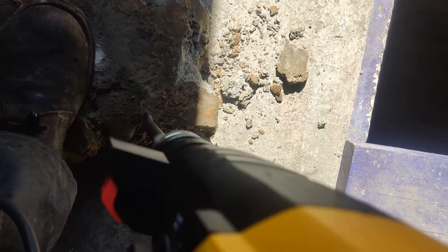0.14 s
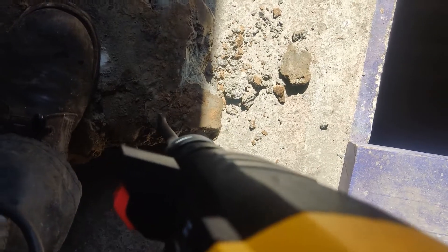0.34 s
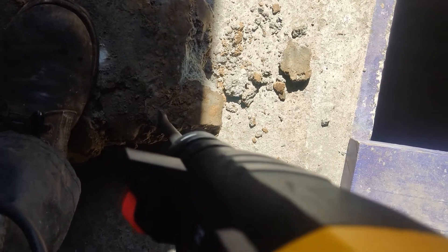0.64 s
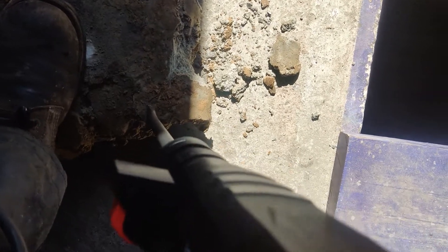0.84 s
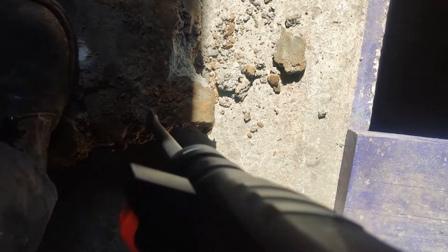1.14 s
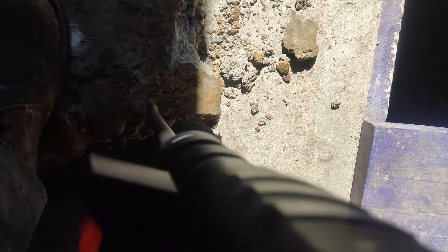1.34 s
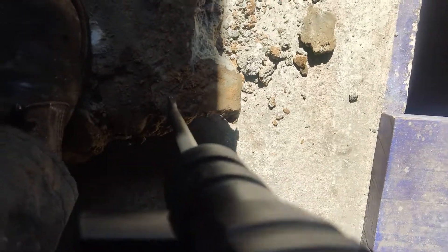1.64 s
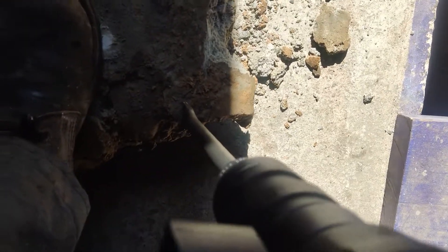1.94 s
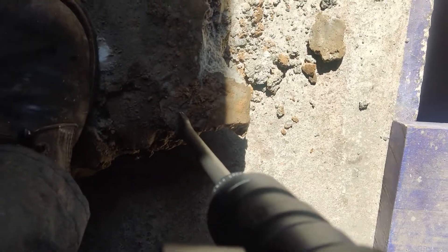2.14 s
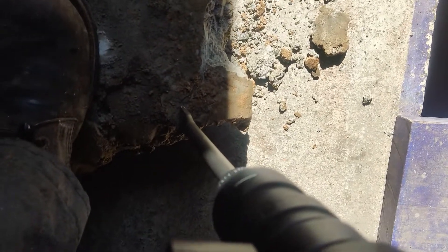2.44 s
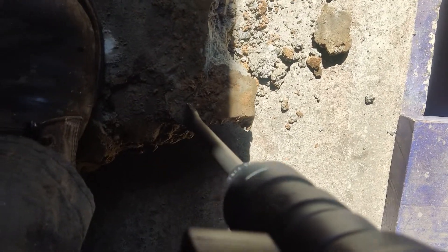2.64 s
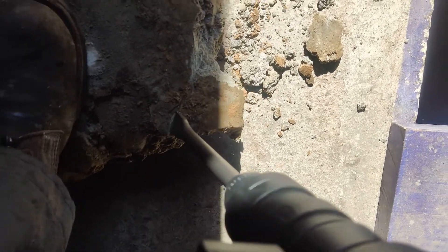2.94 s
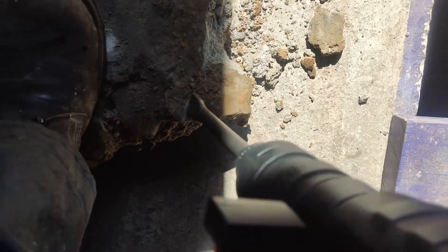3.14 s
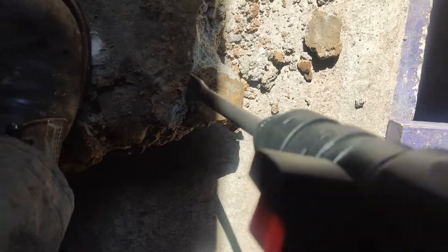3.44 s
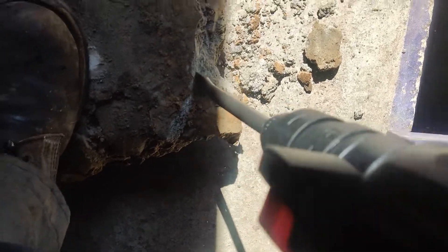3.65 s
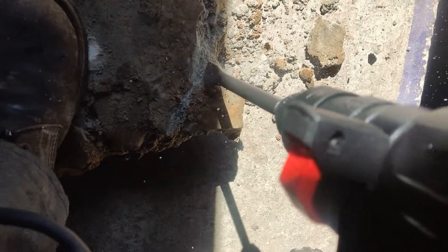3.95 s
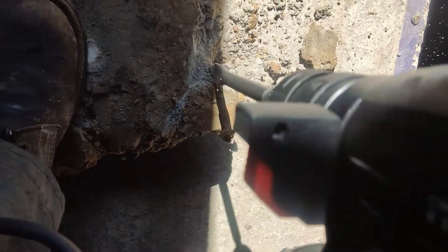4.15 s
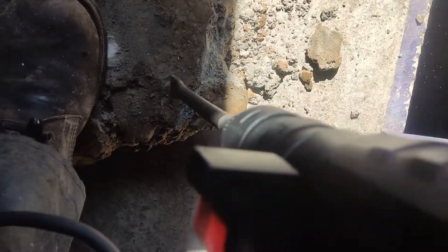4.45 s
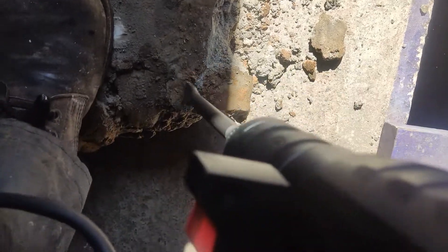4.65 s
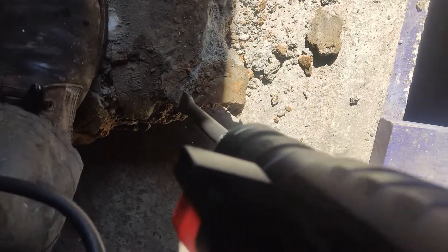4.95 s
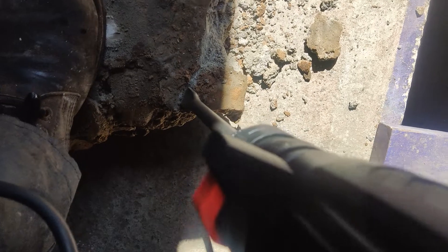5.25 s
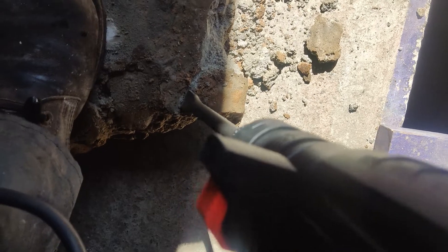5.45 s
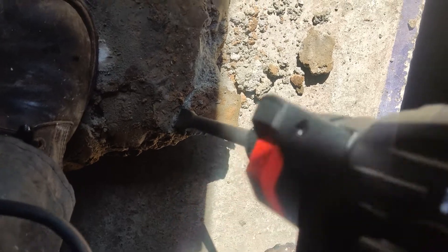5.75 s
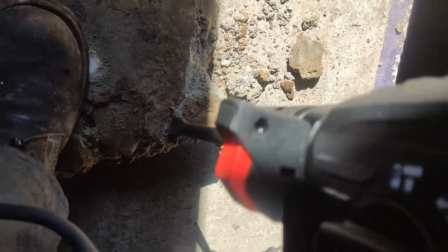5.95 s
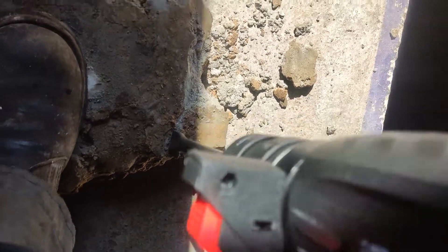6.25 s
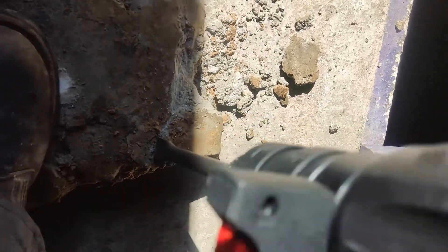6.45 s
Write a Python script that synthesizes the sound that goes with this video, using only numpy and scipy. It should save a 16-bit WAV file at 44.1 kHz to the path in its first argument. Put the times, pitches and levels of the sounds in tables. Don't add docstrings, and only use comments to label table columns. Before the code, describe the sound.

From 0 to 2 s, low hand and wind rumble lies under soft, bright rustling of cloth and grit. A double knock of the bit on concrete falls at about 0.18 s, faint rubble ticks follow, and a soft hollow bump comes at 1.5 s. At 2.1 s a rotary hammer stirs with loose rattles and ticks, then speeds up; from 2.5 to 3 s, bright cement cracks scatter over the blows. By 3 s it pounds at nearly sixty blows a second, gears chattering and steel ringing more from 3.4 s, fastest and loudest around 3.9 s. Released near 4.2 s, it coasts down, duller, with loose knocks, groans and dragging puffs, resting by 5.1 s. After a tiny silence, the bit scrapes and lands sharply at 5.2 s, rubble clicks to 5.7 s, rumble returns, and crisp rustling swells from 6.2 s to the end, with a faint bump at 6.3 s. Close, dry stereo.

```python
import sys
import numpy as np
from scipy import signal
from scipy.fft import rfft, irfft, next_fast_len
from scipy.io import wavfile
from scipy.ndimage import uniform_filter1d

SR = 44100
rng = np.random.default_rng(int(sys.argv[2]) if len(sys.argv) > 2 else 0)


def transcribe(signal):
    frames = np.atleast_2d(signal).T
    limited = np.clip(frames, -1, 1)
    pcm = np.round(limited * 32767).astype(np.int16)
    wavfile.write(sys.argv[1], SR, pcm)


def amplitude_ratio(level_db):
    exponent = np.asarray(level_db, float) / 20
    return 10 ** exponent


N = 290619
T = np.arange(N) / SR
SIDES = np.array([[.5], [-.5]])
RELEASE_S = 4.175
PORT_LAG, SLAB_LAG = 20, 14


def curve(table):
    return np.interp(T, *np.transpose(table))


def columns(table):
    s, *values = np.transpose(table)
    inside = uniform_filter1d(1. * ((T >= s[0]) & (T <= s[-1])), size=40)
    return inside, [np.interp(T, s, v) for v in values]


def unit(x):
    return x / np.sqrt(np.mean(x ** 2))


def steady(x):
    return x / np.sqrt(uniform_filter1d(x ** 2, size=5000) + 1e-12)


def walk(rate):
    hold = int(SR / rate)
    goals = np.repeat(rng.standard_normal(N // hold + 1), hold)
    return 0.47 * uniform_filter1d(goals, hold)[:N]


def noise(alike, count=0):
    alike = np.clip(alike, 0, 1)
    shared, *own = rng.standard_normal((3, N))
    together = np.array([np.roll(shared, count), shared])
    return np.sqrt(alike) * together + np.sqrt(1 - alike) * np.array(own)


def ring(x, modes, patchy_db=0):
    total = 0
    for k, (hz, width_hz, db) in enumerate(modes):
        gain = amplitude_ratio(db + patchy_db * walk(14)) if patchy_db else amplitude_ratio(db)
        tone = signal.lfilter(*signal.iirpeak(hz, hz / width_hz, SR), x)
        total = total + (-1) ** k * gain * tone
    return total


def band(x, lo_hz, hi_hz):
    return signal.sosfilt(signal.butter(3, [lo_hz, hi_hz], "band", fs=SR, output="sos"), x)


def colour(x, points):
    hz, db = np.transpose(points)
    n = next_fast_len(N)
    log_hz = np.log(np.arange(n // 2 + 1) * SR / n + 1)
    shape = amplitude_ratio(np.interp(log_hz, np.log(hz), db))
    return unit(irfft(rfft(x, n) * shape, n)[:, :N])


def bursts(s, size, decay_ms):
    x = np.zeros(np.shape(size)[:-1] + (N,))
    np.add.at(x, (..., (s * SR).astype(int)), size)
    return signal.lfilter([1], [1, -np.exp(-1000 / (decay_ms * SR))], x)


def swell(s, half, db):
    return amplitude_ratio(db) * np.sqrt(np.clip(1 - ((T - s) / half) ** 2, 0, 1))


def stirs(rows, bed_db):
    # start_s, end_s
    hush_s = (1.912, 5.13)
    hush = (T > hush_s[0]) & (T < hush_s[1])
    power = amplitude_ratio(bed_db - 11.5 * hush) ** 2
    for s, half, db in rows:
        same_side = hush == (hush_s[0] < s < hush_s[1])
        power = power + (amplitude_ratio(db) * np.clip(1 - ((T - s) / half) ** 2, 0, 1) * same_side) ** 2
    return np.sqrt(power)


def rumble():
    # time_s, level_db
    hum_level = [(0, -59), (.21, -46), (1.33, -44), (1.41, -55.5), (1.5, -43.5), (1.9, -57), (1.93, -62),
                 (2.5, -73), (2.67, -57.5), (3.04, -51.5), (3.67, -57), (3.8, -38), (4.12, -50.5),
                 (4.25, -76), (4.87, -53), (5.12, -54), (5.3, -37.5), (6.59, -43)]
    # pitch_hz, width_hz, level_db
    sway_modes = [(22.8, 8.8, 0)]
    hum_modes = [(58.1, 9.6, 6.5), (69.7, 22, -6)]
    drone_modes = [(114.4, 21.6, -1), (137, 31.5, -7.5), (151.5, 14.3, -2), (202.5, 47.4, -3),
                   (225.6, 91, -7.5)]
    # time_s, level_db
    tone_level = [(0, -67), (1.9, -77), (1.92, -99), (4.43, -97), (4.49, -66), (4.56, -89), (4.69, -68),
                  (4.9, -72), (5.0, -99), (5.35, -97), (5.45, -63), (5.9, -49.5), (6.3, -52), (6.36, -89),
                  (6.59, -85)]
    # centre_s, half_length_s, drone_db, sway_over_drone_db
    jolts = [(0.266, 0.11, -42.5, -22), (.98, .15, -80, -9), (1.526, 0.032, -54.5, -8),
             (1.773, 0.37, -66.5, 14), (2.3, 0.25, -53.5, -32), (2.673, 0.22, -63, 7),
             (3.015, 0.14, -53.5, 5), (3.434, 0.044, -43.5, 12), (3.475, 0.44, -47.5, 5),
             (3.894, 0.34, -45, 8), (4.62, 0.47, -86, 29), (4.96, 0.22, -63.5, 9), (5.274, 0.049, -34, -20),
             (5.307, 0.19, -43, -6), (5.775, 0.58, -53.5, 11.5), (6.07, 0.1, -57, -4),
             (6.436, 0.19, -52.5, 12.5)]
    sway_level = stirs([(s, half, db + share) for s, half, db, share in jolts], -68)
    sway = unit(band(ring(noise(0.53), sway_modes), 18.2, 28.1)) * sway_level
    hum = unit(band(ring(noise(.92), hum_modes), 25.0, 113)) * amplitude_ratio(curve(hum_level))
    drone_level = stirs([row[:3] for row in jolts], -64)
    drone = unit(band(ring(noise(0.88), drone_modes), 88.0, 298)) * drone_level
    tone_hz = 200.6 + 3 * walk(36)
    tone = np.sin(2 * np.pi * np.cumsum(tone_hz) / SR) * amplitude_ratio(curve(tone_level) + 2 * walk(1.82))
    return sway + hum + drone + tone


def membrane_drift():
    # time_s, offset (share of full scale)
    offset = [(4.12, 0), (4.19, .014), (4.31, 0), (4.45, -.008), (4.7, -.01), (4.9, 0)]
    return uniform_filter1d(curve(offset), size=2500)


def rustle():
    # centre_s, half_length_s, hiss_db, dull_over_hiss_db, left_minus_right_db
    rubs = [(0.02, 0.16, -57.5, -5, -2), (0.24, 0.11, -56.5, 3, 0), (0.655, 0.088, -59, -11, -6),
            (0.715, 0.034, -61, -9, -3), (0.824, 0.2, -57.5, -2, -0.5), (1.098, 0.15, -56.5, -5.5, -1.5),
            (1.357, 0.13, -57, -7.5, 6), (1.58, 0.15, -55, -5, 4), (1.838, 0.16, -62, -4, 3.5),
            (5.143, 0.017, -49, 3, 14), (5.16, 0.04, -52, 6.5, 4), (5.217, 0.044, -45, 4, 2),
            (5.288, 0.099, -54.5, 3, -2), (5.55, 0.3, -56.5, -2.5, -3.5), (5.89, 0.22, -56, -5.5, 2.5),
            (6.127, 0.071, -59.5, -8, 9), (6.246, 0.1, -38, -41, 13.5), (6.202, 0.029, -47, -30, 11),
            (6.32, 0.098, -42, -18, 11), (6.396, 0.027, -44, -14, 10), (6.436, 0.05, -52, -13, 8),
            (6.528, 0.11, -46.5, -13, 8)]
    # pitch_hz, level_db (per Hz)
    dull_spectrum = [(150, -45), (250, 0), (418, -5.5), (551, -3), (601, -3.5), (822, -7.5), (5000, -18.5),
                     (6500, -17.5), (11000, -120)]
    # pitch_hz, level_db (per Hz)
    left_spectrum = [(3000, -25.5), (4000, -20.5), (6500, -19), (8400, -13), (9500, -11), (10700, -5.5),
                     (12500, -14), (14500, -16.5)]
    right_spectrum = [(3000, -21.5), (4000, -13.5), (6500, -16.5), (8400, -2.5), (9500, -13), (10700, -17),
                      (12500, -24), (14500, -20)]
    left, right = noise(0)[:, None] * amplitude_ratio(2.0 * walk(700))
    hiss = np.vstack([colour(left, left_spectrum), colour(right, right_spectrum)])
    bright_level = stirs([(s, half, db + SIDES * pan) for s, half, db, _, pan in rubs], -66)
    hiss = hiss * bright_level * amplitude_ratio(3.8 * walk(25))
    dull = colour(noise(0.22) * amplitude_ratio(2.0 * walk(200)), dull_spectrum)
    dull_level = stirs([(s, half, db + share) for s, half, db, share, _ in rubs], -66)
    return hiss + dull * dull_level * amplitude_ratio(walk(13))


def strokes():
    # centre_s, half_length_s, level_db
    swishes = [(0.645, 0.046, -71), (1.091, 0.062, -53), (1.249, 0.021, -52), (1.35, 0.04, -56),
               (1.598, 0.054, -48.5), (5.559, 0.015, -49)]
    # pitch_hz, width_hz, level_db
    sleeve_modes = [(4170, 2100, -1), (8700, 1240, 7.5), (10600, 2000, 4), (13100, 2000, -2)]
    # centre_s, half_length_s, level_db
    bit_scrape = (5.2, .021, -42)
    # pitch_hz, width_hz, level_db
    scrape_modes = [(1000, 200, -4), (2000, 200, 0), (2800, 200, -6), (3550, 200, -1)]
    sleeve = unit(ring(noise(0), sleeve_modes)) * sum(swell(*row) for row in swishes)
    grains = noise(0.065) * amplitude_ratio(2.1 * walk(500))
    return sleeve + unit(ring(grains, scrape_modes)) * swell(*bit_scrape)


def knocks():
    # time_s, peak_db, hardness_db, left_minus_right_db
    landings = [(0.1799, -26, -16, -0.5), (0.185, -18.5, 2, -3), (5.1425, -32.5, 4.5, -8),
                (5.2192, -24.5, -7, 0), (5.2364, -17, 5.5, -2), (1.5092, -50, -1, 0),
                (5.6072, -39.5, 7, -4.5), (5.6213, -42.5, -20, 0)]
    # time_s, peak_db, hardness_db,
    # left_minus_right_db
    rubble = [(0.1444, -35.5, 7.5, -1), (0.4208, -49.5, 3, 2), (0.451, -59, -1.5, 5),
              (0.478, -49.5, 3.5, -6), (0.6875, -47, -2, -3), (0.607, -65, -3.5, 0), (2.3203, -41, -2, 4),
              (5.4224, -31.5, 4, -6.5), (5.478, -41.5, 2.5, 2), (5.4906, -38.5, 5.5, -6)]
    # time_s, peak_db, hardness_db, left_minus_right_db
    ticks = [(0.925, -52.5, 7, 2), (1.835, -50, -3, -.5), (2.083, -28.5, 3.5, -2), (0.476, -54, -14, -2),
             (0.6883, -42.5, -14, -3), (1.51, -51, -5, 1), (5.1356, -46, 8, -9), (5.1434, -38, -3, -8),
             (5.1832, -49, -10, -2), (5.22, -38, 10, -11), (6.178, -44, 6, 6), (2.242, -28, 11.5, -1),
             (2.477, -23.5, -8, 0), (5.498, -45.5, 13, 12), (5.576, -51, 18, -11), (5.6891, -46.5, 11, -6),
             (6.31, -37, 3, -8), (6.3992, -35, 0.5, 17.5), (6.436, -51, 8, 3), (6.4474, -56, 10, 7)]
    # boom_db, body_db, crack_db, then body and crack change in dB per dB of hardness
    kinds = [
        (-13.5, -13, -13.5, -0.21, 1),
        (-29, -4.5, -15.5, -1.72, .3),
        (-62, -25, -7.5, 0.7, 0.66),
    ]
    # pitch_hz, width_hz, level_db
    body_modes = [(330, 160, -2), (490, 100, 3), (760, 200, -1), (1050, 300, -4), (1300, 350, -9)]
    boom_modes = [(91.2, 7.9, 0.5), (136, 18, -5), (145, 8.6, 2), (184.6, 9.8, -2.5), (224.5, 4.9, -7),
                  (290.5, 8.8, -3), (344, 12.4, -8.5), (504, 28, -14.5)]
    tables = landings, rubble, ticks
    s, peak, hard, pan = np.vstack(tables).T
    per_knock = np.repeat(kinds, [len(t) for t in tables], axis=0)
    boom, body, crack, body_slope, crack_slope = per_knock.T
    body, crack = body + body_slope * hard, crack + crack_slope * hard
    peak = peak + SIDES * pan

    push = 3 * bursts(s, amplitude_ratio(peak - 9.5), 0.18)
    splinters = bursts(s, amplitude_ratio(peak + 9.5), 0.84) * noise(0.039)
    click = band(push + splinters, 1500, 3160)
    push = 3 * bursts(s, amplitude_ratio(peak + crack - 7), 0.008)
    splinters = bursts(s, amplitude_ratio(peak + crack + 14.0), 1.0) * noise(0.017)
    click += band(push + splinters, 5160, 10600)
    push = bursts(s, amplitude_ratio(peak + body + 23.0), 0.12)
    splinters = bursts(s, amplitude_ratio(peak + body + 24.0), 5.0) * noise(0.4)
    click += ring(push + splinters, body_modes)
    click += band(bursts(s, amplitude_ratio(peak + body + 6.5), 1.0), 105, 280)

    yard = band(bursts(s, amplitude_ratio(peak - 15.5), 16.5) * noise(0), 130, 10300)
    heavy = amplitude_ratio(peak + boom - 0.65 * hard + 29.5)
    slab_push = bursts(s, heavy, 0.69) + .5 * bursts(s, heavy, 21.5) * noise(0.93)
    return click + yard + ring(slab_push, boom_modes)


def bumps():
    # time_s, level_db, contact_ms
    contacts_felt = [
        (1.5103, -26.5, 0.4),
        (1.5183, -38, .9),
        (6.305, -42, 0.54),
        (6.3135, -46, .6),
    ]
    # pitch_hz, width_hz, level_db
    hollow = [(490, 38, -4)]
    push = sum(amplitude_ratio(db) * np.exp(-np.abs(T - s) * 1000 / ms) for s, db, ms in contacts_felt)
    return push - uniform_filter1d(push, size=330) + 2.5 * ring(push, hollow)


def chips():
    # time_s, peak_db
    cracks = [(2.4874, -15), (2.507, -18), (2.5167, -20), (2.5439, -17), (2.5621, -20), (2.571, -15),
              (2.597, -20), (2.6234, -20), (2.6472, -17), (2.6727, -14), (2.6971, -21), (2.724, -11.5),
              (2.747, -12), (2.7703, -15.5), (2.776, -16), (2.8143, -19), (2.841, -16), (2.864, -17),
              (2.8865, -24), (2.9076, -15), (2.929, -25), (2.947, -15), (2.535, -20), (2.577, -20),
              (2.590, -21), (2.615, -18), (2.667, -21), (2.678, -15), (2.737, -22), (2.787, -21),
              (2.798, -20), (2.820, -18), (2.845, -18), (2.966, -16), (2.985, -18)]
    # pitch_hz, width_hz, level_db
    chip_modes = [(3940, 930, -3.5), (8500, 1200, -1), (10840, 690, 2), (13600, 3000, -6.5)]
    # time_s, level_db, left_minus_right_db, pitch_hz, width_hz
    chuck_snap = (5.2363, 1, -10, 7900, 2600)
    s, db = np.transpose(cracks)
    chipping = unit(ring(noise(0.33), chip_modes)) * bursts(s, amplitude_ratio(db - 7.0), 1)
    at, snap_db, pan, hz, width_hz = chuck_snap
    snap_level = uniform_filter1d(bursts(np.array([at]), amplitude_ratio(snap_db + SIDES * pan), .2), size=20)
    snap = snap_level * np.sin(2 * np.pi * hz * (T - at))
    return chipping + ring(snap, [(hz, width_hz, 0)])


def coast(gear_db, housing_db, top_pan, body_pan):
    # time_s, chuck_db (over its rattle), housing_db (over its rattle)
    loose = [(4.181, -5, 10), (4.2045, 4, 4), (4.2144, 5, 8), (4.253, 9, 6), (4.2662, 11, 7),
             (4.2782, 0, 8.5), (4.2937, 13.5, 1), (4.3084, 6, -2), (4.324, 10, -6), (4.3387, 8, 1),
             (4.358, 8, 10), (4.373, 9, 6), (4.393, 10, 8), (4.427, 5, 5), (4.446, 7, 6), (4.4653, 9.5, 9),
             (4.5177, 4, -14), (4.5356, -2, -13), (4.544, -9, -4), (4.569, 10, -13), (4.601, 3, -1),
             (4.623, 7, -5), (4.6945, 12, 1), (4.773, 4, -18), (4.791, 6, -11)]
    # pitch_hz, width_hz, level_db
    chuck_modes = [(4140, 1800, -9), (6180, 950, -2.5), (8470, 1170, -1), (10860, 710, 0),
                   (12250, 1100, -9.5), (14050, 450, -19)]
    shell_modes = [(334, 170, -17.5), (620, 340, -13), (1100, 330, -4.5), (1730, 460, -1.5), (2175, 650, 0),
                   (2740, 450, -1.5), (3410, 600, -6)]
    # start_s, length_s, level_db (over the hiss)
    drags = [(4.832, 0.013, 2.5), (4.866, 0.0075, 4), (4.888, 0.018, 6), (4.927, 0.014, 8.5),
             (4.966, 0.018, 10.5), (5.017, 0.029, 10)]
    # centre_s, half_length_s, level_db (over the housing)
    groans = [(4.21, .04, -14), (4.36, .04, -15), (4.615, 0.026, -8.5), (4.8, .015, -14),
              (4.87, 0.016, -12), (4.925, 0.028, -10.5)]
    # pitch_hz, width_hz, level_db
    groan_modes = [(520, 150, 0.16)]
    s, chuck_db, shell_db = np.transpose(loose)
    drag_db = sum(db * ((T > start) & (T < start + length)) for start, length, db in drags)
    puffs = amplitude_ratio(uniform_filter1d(drag_db, size=80))
    chuck = amplitude_ratio(2.9 * walk(700)) + uniform_filter1d(bursts(s, amplitude_ratio(chuck_db), 2), size=90)
    shell = amplitude_ratio(2.9 * walk(700)) + uniform_filter1d(bursts(s, amplitude_ratio(shell_db), 2), size=90)
    top = ring(noise(0.17, count=PORT_LAG), chuck_modes, patchy_db=3.0)
    top = unit(band(top, 2300, 13000)) * chuck * puffs
    body = ring(noise(0.44, count=PORT_LAG) * shell, shell_modes, patchy_db=3.5)
    body = unit(band(body, 200, 4300))
    body = body + unit(ring(noise(0.7, count=SLAB_LAG), groan_modes)) * sum(swell(*row) for row in groans)
    top = top * amplitude_ratio(gear_db - 2.0 + SIDES * 1.08 * top_pan)
    return top + body * amplitude_ratio(housing_db - 1.5 + SIDES * 0.66 * body_pan)


def crank():
    # time_s, speed (turns per second)
    powered = [(2.08, 8.0), (2.3, 17.0), (2.4, 25.37), (2.5, 35.12), (2.6, 38.57), (2.8, 42.52),
               (2.9, 46.41), (3.0, 54.79), (3.1, 56.17), (3.3, 58.05), (3.5, 57.66), (3.68, 58.1),
               (3.78, 68.16), (3.9, 73.13), (4.0, 69.91), (4.1, 56.97)]
    coast_s = .38
    s, rate = np.transpose(powered)
    speed = np.interp(T, s, rate) * np.exp(-np.maximum(T - s[-1], 0) / coast_s)
    turn = .53 + np.cumsum(speed * (T >= s[0])) / SR
    return turn, speed


def turn_contacts(turn):
    contacts = [
        (0, .002, .9),
        (.15, .015, 3),
        (.56, .025, 3.5),
    ]
    count = np.arange(1, int(turn[-1]) - 1)
    chance = rng.standard_normal((len(count), 3, 2))
    times, sizes = [], []
    for k, (place, slip, scatter_db) in enumerate(contacts):
        times.append(np.interp(count + place + slip * chance[:, k, 0], turn, T))
        sizes.append(amplitude_ratio(scatter_db * chance[:, k, 1]))
    return times, sizes


def rattle(times, sizes, speed, load, part_db, top_pan, body_pan):
    # decay_ms, blow_db, rebound_db, reversal_db (over the rattle), left_minus_right_db, likeness (0-1)
    answer = [
        (1.2, 14, 9, 5, 1.5, .2),
        (1.1, 13, 10, 8.5, -1.5, .15),
        (1.3, 3, 8, 7, -2, .5),
        (1.5, 3, 2, 0, .3, .55),
    ]
    # pitch_hz, width_hz, level_db
    bit = [(10620, 290, 13), (12300, 670, 1.5), (13600, 1300, -7)]
    gears = [(8300, 670, -14.5), (7280, 1300, -5), (4700, 2250, -3), (5490, 1850, 1.5), (8520, 2200, 3.5)]
    housing = [(1690, 1900, -5.5), (2074, 260, 3.5), (2540, 760, -4.5), (3610, 545, 2), (4075, 1050, -6)]
    slab = [(350, 74, -8), (550, 150, -5.5), (744, 116, -4), (936, 180, -3.5)]
    patchy = [1, 2.2, 2.3, 1.4]
    grit = amplitude_ratio(2.5 * walk(900)) * np.clip(speed / 45, 1, 2) ** 1.6
    pans = top_pan, top_pan, body_pan, body_pan
    handed_over = .8, 0, 0, .8
    total = 0
    parts = zip(answer, (bit, gears, housing, slab), part_db, pans, patchy, handed_over)
    for (ms, *contact_db, side_db, alike), modes, db, pan, patchy_db, given in parts:
        blow, rebound, reversal = (amplitude_ratio(d) * bursts(t, z, ms) for d, t, z in zip(contact_db, times, sizes))
        hits = load * (blow + rebound) + np.clip(0.95 * load, .3, 1) * reversal
        shake = steady(grit + uniform_filter1d(hits, size=70))
        sound = unit(ring(shake * noise(alike, count=PORT_LAG), modes, patchy_db=patchy_db))
        level = amplitude_ratio(db + SIDES * (0.52 * pan + side_db))
        total = total + np.sqrt(1 - given * load ** 2) * sound * level
    return total


def struck_steel(times, sizes, bit_db, gear_db, top_pan):
    # pitch_hz, width_hz, level_db
    light_modes = [(10860, 300, 0), (12950, 330, -6)]
    seated_modes = [(10670, 130, 0), (11000, 500, -7), (12700, 90, -5)]
    tip_modes = [(13970, 110, 0), (14150, 90, -2)]
    clang_modes = [(8200, 360, 0)]
    # time_s, level_db
    freedom = [(2.3, -3), (2.9, -0.5), (3.15, -1), (3.35, 1), (3.55, 5.5), (3.68, 3.5), (3.78, 3.5),
               (3.9, -2.5), (4.1, 2), (4.2, 11)]
    # time_s, level_db (under the bit)
    singing = [(2.4, -26), (2.9, -18), (3.05, -17), (3.12, -26), (3.5, -30), (3.72, -28), (3.8, -19),
               (4.05, -15), (4.2, -18)]
    # centre_s, half_length_s, level_db
    clang = (3.485, 0.074, -5.5)
    hits = bursts(times[0], sizes[0], 1.6) + 0.3 * bursts(times[1], sizes[1], 2.5) + .05
    strike = steady(uniform_filter1d(hits, size=90)) * (T > 2.2) * (T < 4.9)
    struck = strike * noise(0.02)
    seated = uniform_filter1d(1. * (T > 3.41), size=4000)
    light_ring = ring(struck * (1 - seated), light_modes, patchy_db=4.0)
    seated_ring = ring(struck * seated, seated_modes, patchy_db=-0.5)
    steel = unit(light_ring + 1.02 * seated_ring)
    steel = steel + 3 * unit(ring(struck, tip_modes)) * amplitude_ratio(curve(singing))
    steel = steel * amplitude_ratio(bit_db - 6.0 + curve(freedom) + SIDES * (top_pan + 17.0))
    return steel + unit(ring(struck, clang_modes)) * swell(*clang) * amplitude_ratio(gear_db + SIDES * top_pan)


def pushed_slab_and_barrel(times, sizes, slab_db, housing_db):
    # pitch_hz, width_hz, level_db
    thud_modes = [(500, 136, 0), (754, 180, -1.5)]
    low_modes = [(70, 57, -8), (186, 49, -2), (332, 62, 0.5)]
    barrel_modes = [(1569, 30, 0)]
    # time_s, whole_slab_db, barrel_db
    coupling = [(2.4, -12, -4), (2.85, -9, -3.5), (3.0, -6.5, -3.5), (3.15, -2, 2.5), (3.45, 1, 0.5),
                (3.6, 4.5, -9), (3.75, -3.5, -5), (3.9, -5, 6), (4.0, -5, 3), (4.15, -9, -4)]
    push = steady(bursts(times[0], sizes[0] ** .8, 0.027)) * (T > 2.2) * (T < 4.9)
    _, (whole_db, barrel_db) = columns(coupling)
    to_slab = np.array([np.roll(push, SLAB_LAG), push])
    low = unit(ring(to_slab, low_modes, patchy_db=6.5)) * amplitude_ratio(whole_db)
    slab = (unit(ring(to_slab, thud_modes, patchy_db=1.5)) + low) * amplitude_ratio(slab_db - 4.0)
    to_barrel = np.array([np.roll(push, PORT_LAG), push])
    barrel = unit(ring(to_barrel, barrel_modes, patchy_db=3.5)) * amplitude_ratio(housing_db - 10 + barrel_db)
    return slab, barrel


def hammer():
    # time_s, level_db, housing_facing_phone_db, left_minus_right_db
    tool = [(2.08, -42, 3.5, -4), (2.12, -36, 1, 0), (2.18, -39.5, 2, -1), (2.25, -36, 0, 2),
            (2.45, -32, 0, 5), (2.52, -35.5, -4.5, -8.5), (2.79, -35, -3, 0), (3.0, -30, -4, 1),
            (3.16, -32, -0.5, 0), (3.56, -28.5, -6.5, 0), (3.7, -31, -2, -3), (3.76, -27, -6, -0.5),
            (4.15, -27.5, -7.5, -3), (4.22, -37, -4, -5), (4.35, -34.5, -1.5, 6.5), (4.65, -33, -2, 4.5),
            (4.86, -40.5, 0.5, -2.5), (5.04, -56, 4.5, -1.5), (5.123, -65.5, -2, -4)]
    # time_s, load (0-1)
    pressing = [(2.08, .05), (2.28, .15), (2.33, .35), (2.4, .4), (2.44, .55), (2.48, .8), (2.55, 1),
                (3.0, 1), (3.6, .9), (4.15, .75), (4.23, .2), (5.1, .1)]
    # time_s, level_db
    bite = [(2.08, -16.5), (2.3, -13), (2.45, -7), (2.6, -6), (2.85, -9.5), (3.0, -13), (3.15, -13.5),
            (3.35, -13.5), (3.58, -14.5), (3.75, -10.5), (3.87, -5.5), (4.0, -5), (4.17, -15), (4.5, -12.5),
            (5.12, -5)]
    on, (gear_db, facing_db, body_pan) = columns(tool)
    load = curve(pressing)
    turn, speed = crank()
    housing_db = gear_db + facing_db
    top_pan = -7.5 + 0.9 * body_pan
    bit_db = gear_db - 6.5 + load + 5 * speed / 60
    slab_db = housing_db + curve(bite) + 1.5 * walk(10)
    times, sizes = turn_contacts(turn)
    part_db = bit_db, gear_db, housing_db, slab_db
    shaken = rattle(times, sizes, speed, load, part_db, top_pan, body_pan)
    steel = struck_steel(times, sizes, bit_db, gear_db, top_pan)
    slab, barrel = pushed_slab_and_barrel(times, sizes, slab_db, housing_db)
    pounding = shaken + load * (steel + slab + load * barrel)
    free = uniform_filter1d(1. * (T > RELEASE_S), size=2600)
    coasting = coast(gear_db, housing_db, top_pan, body_pan)
    return (pounding * np.sqrt(1 - free) + coasting * np.sqrt(free)) * on


def scene():
    background = rumble() + membrane_drift() + rustle() + strokes()
    return background + knocks() + bumps() + chips() + hammer()


def roll_off(x):
    return signal.sosfilt(signal.butter(12, 15630, fs=SR, output="sos"), x)


def record(dry):
    top_hz = 14230
    # start_s, end_s
    dropout_s = (5.1225, 5.131)
    cut = signal.ellip(12, .5, 65, top_hz, fs=SR, output="sos")
    top = band(dry, top_hz, top_hz + 450)
    usual = uniform_filter1d(top ** 2, size=3000)
    spike = uniform_filter1d(top ** 2, size=90) > amplitude_ratio(6.5) ** 2 * usual
    spike = spike * ((T < 3.5) | (T > RELEASE_S))
    opening = uniform_filter1d(uniform_filter1d(1. * spike, size=50), size=50)
    heard = signal.sosfilt(cut, dry) + .5 * top * opening
    present = (T < dropout_s[0]) | (T > dropout_s[1])
    heard = heard * uniform_filter1d(1. * present, size=40)
    return roll_off(heard)


dry = scene()
out = record(dry)
transcribe(out)
```